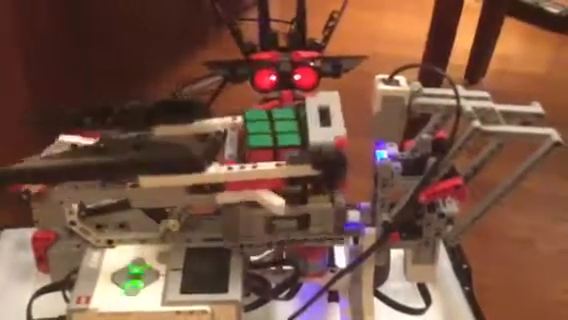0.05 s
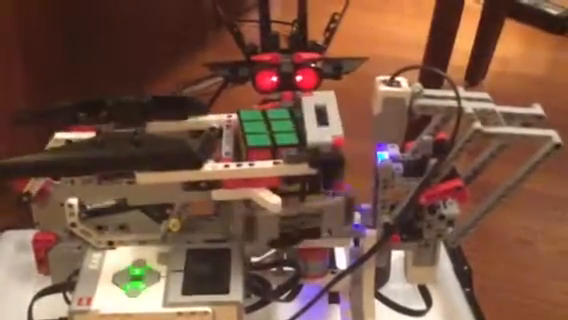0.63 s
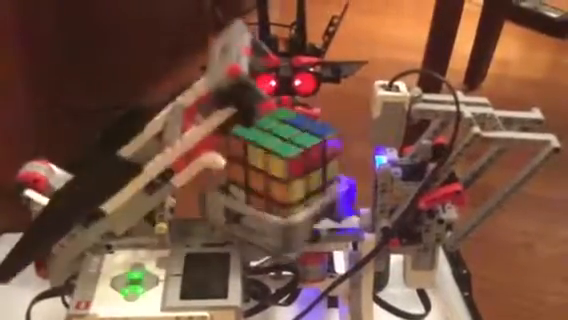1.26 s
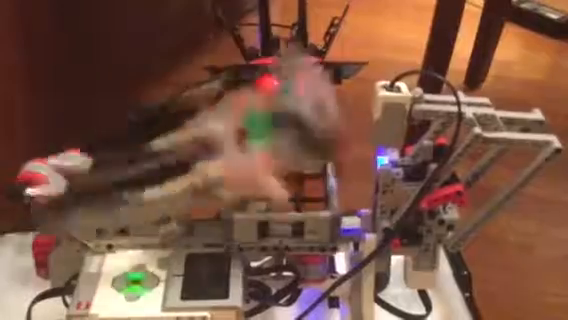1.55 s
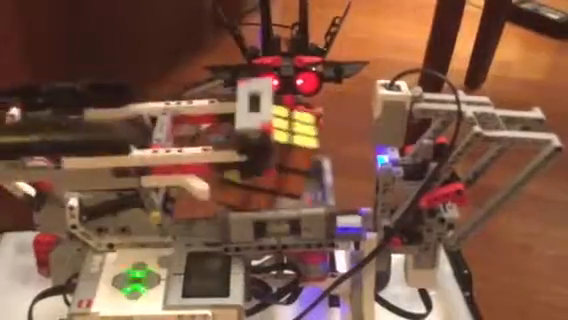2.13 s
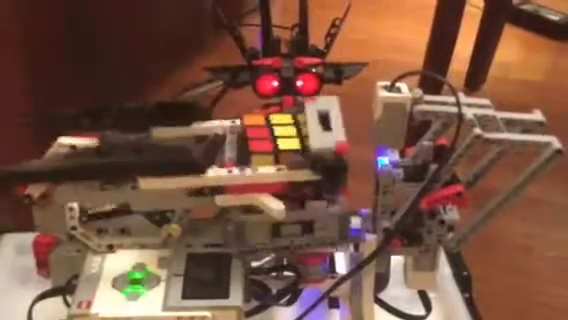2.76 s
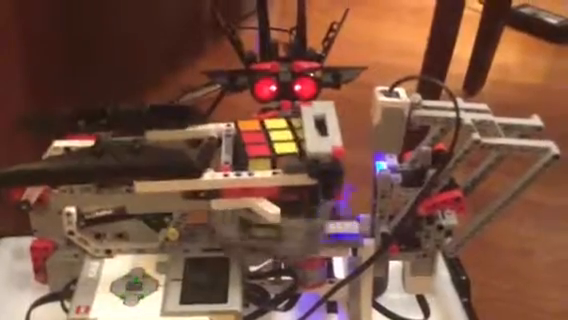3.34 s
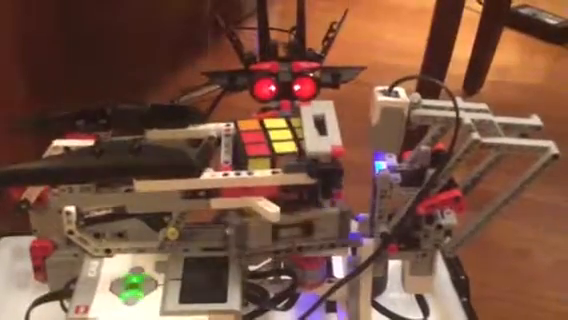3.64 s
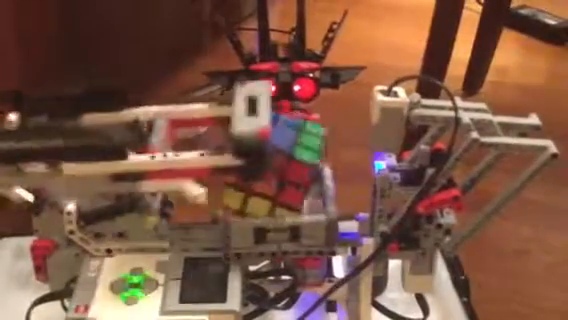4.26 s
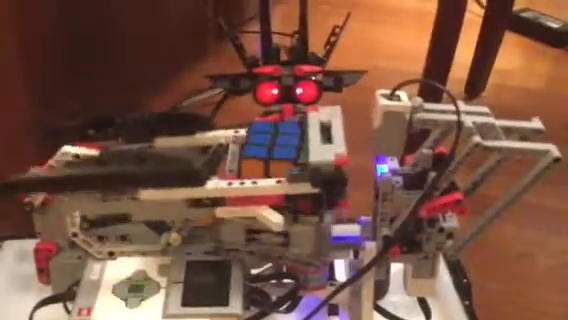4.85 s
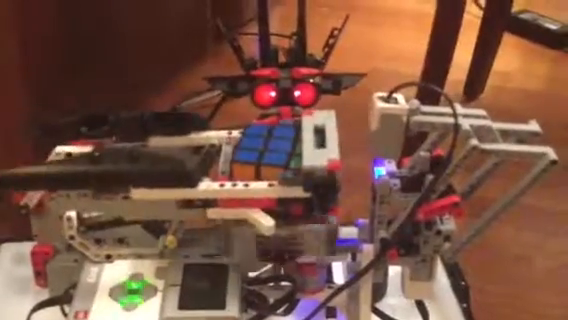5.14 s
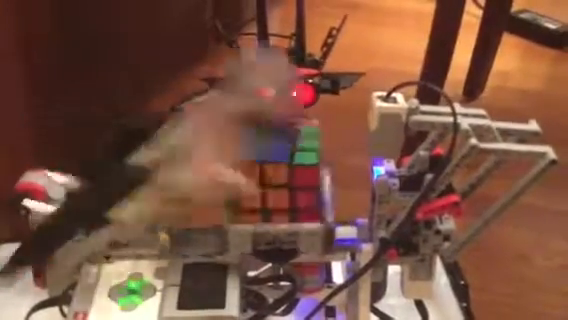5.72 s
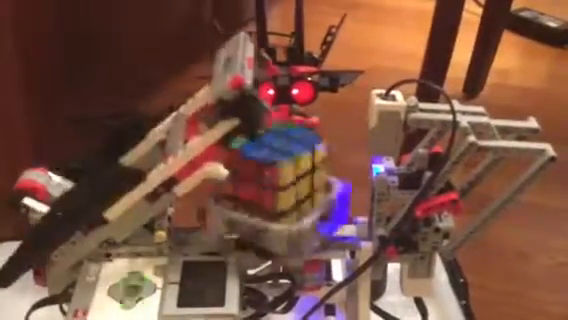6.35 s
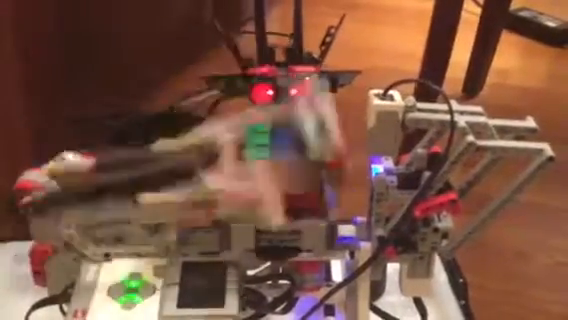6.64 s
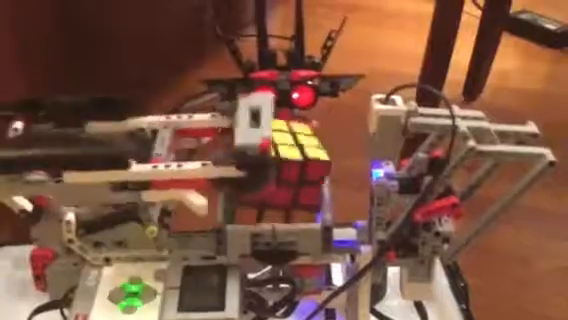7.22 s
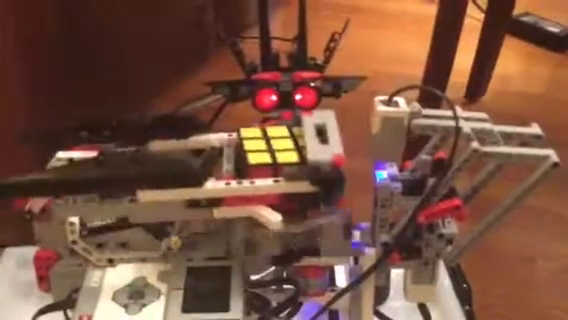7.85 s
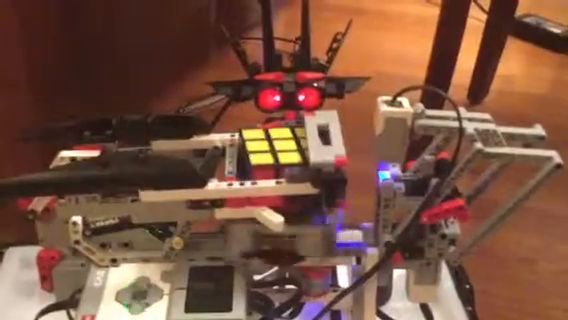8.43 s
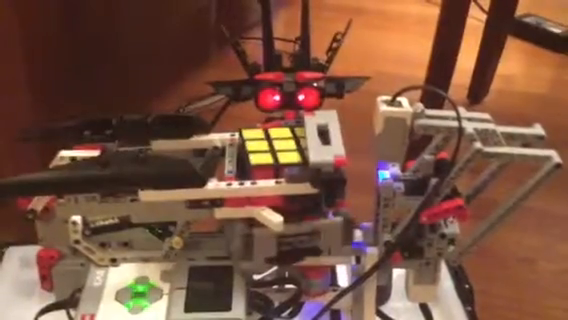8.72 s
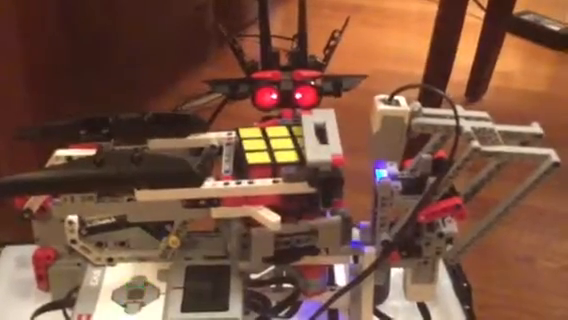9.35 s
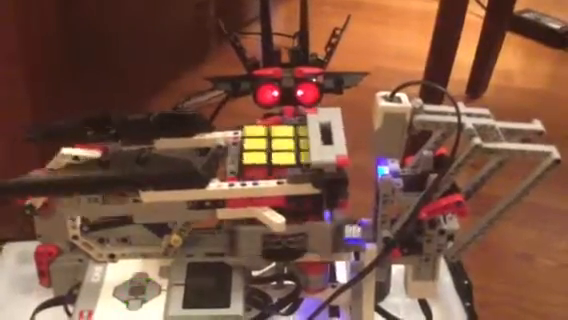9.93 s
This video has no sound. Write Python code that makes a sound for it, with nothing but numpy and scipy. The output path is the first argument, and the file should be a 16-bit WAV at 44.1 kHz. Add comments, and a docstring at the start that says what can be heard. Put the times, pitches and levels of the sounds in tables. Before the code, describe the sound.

Close up, a small geared motor gives a high, rattling whine as a toy robot twists a puzzle cube. Its plastic arm then swings in quick whirs that rise and fall, while cube and arm clack and rattle against the frame. This pattern comes three times, with two brief spells of loose gear chatter. A fourth whine ends the work, leaving the low hum of a quiet room.

```python
"""Toy robot turning a puzzle cube

A robot of plastic bricks works close to the microphone in a quiet room. One geared motor spins the
turntable, singing as it twists a layer of the held cube and chattering as it turns the cube freely.
A second swings the arm that holds and tips it. Cube and arm clack against the frame."""
import sys
import numpy as np
from scipy import signal
from scipy.fft import rfft, irfft
from scipy.io import wavfile

SR = 44100
rng = np.random.default_rng(int(sys.argv[2]) if len(sys.argv) > 2 else 0)


def unload_audio(sound):
    """Save the sound as a 16-bit wav file, at the path given as the first command line argument."""
    columns = np.transpose(np.atleast_2d(sound))
    # keep every value between -1 and 1, then stretch to whole-number steps
    steps = np.round(np.clip(columns, -1, 1) * 32767)
    wavfile.write(sys.argv[1], SR, steps.astype(np.int16))


N = 440118

# The turntable twists the held cube. Each row: start and brake in seconds, level in dB, boost of the
# low, middle and high gearbox resonance in dB, whine in dB, backlash from 0 to 1.
TWISTS = [(0.1, 0.546, -37.5, -2.5, 2.5, 4.3, -3, 0.61), (2.775, 3.569, -37.5, -1.5, 3.5, 4.5, -3.5, .35),
          (4.856, 5.293, -39.5, 4, -3, 8.3, -7, 0.44), (7.821, 8.608, -37.5, -2, 3.5, 4.8, -4, 0.27)]
# Running speed as the cube's friction loads the motor, one curve a twist.
# Each point: time in seconds, tooth rate in Hz.
TWIST_SPEED = [
    [(0.22, 1013), (0.278, 1015), (0.294, 1028), (0.37, 1045), (0.426, 1034), (0.545, 1067)],
    [(2.92, 978.1), (2.97, 995), (3.028, 1035), (3.168, 1050), (3.286, 1031), (3.424, 1037), (3.514, 1065),
     (3.56, 1057)],
    [(4.98, 971.4), (5.276, 1031), (5.29, 1058)],
    [(7.95, 987), (8.044, 1011), (8.214, 1033), (8.272, 1047), (8.462, 1062), (8.61, 1047)],
]
# The turntable runs free. Each row: start and brake in seconds, level in dB.
SPINS = [(1.135, 1.478, -40.5), (5.879, 6.537, -40)]
# The arm swings. Each row: start and length in seconds, top tooth rate in Hz, level in dB,
# then trims in dB for hollow frame, base shake and whine.
SWINGS = [(-.06, 0.11, 471, -54, 10, 6, -23), (0.734, 0.19, 469.7, -49.5, 5, 5.5, -23),
          (0.926, 0.23, 828, -45.5, -20, -9, -0.5), (1.557, .305, 601.3, -45, 7, 4, -19),
          (1.864, 0.28, 852, -44, 5.5, 0.5, -3.5), (2.026, .27, 602, -50, 10, 3, -25),
          (2.303, 0.27, 616.6, -43, -3, -1, -19), (2.527, 0.22, 469, -56, 0, 4, -25),
          (3.771, 0.17, 470.3, -48.5, 7, 5.5, -13), (3.943, 0.25, 866, -42.5, -3.5, -3.5, -5),
          (4.107, 0.32, 603, -49.5, 7.5, 8, -23), (4.382, 0.27, 619, -43, 0, -4, -28),
          (4.625, .18, 476, -56, -6, -8, -27), (5.514, 0.17, 470, -48, -1, 1, -25),
          (5.687, .24, 863.6, -45, -3, 2.5, 0.5), (6.609, 0.31, 600, -44.5, 5.5, 2, -12),
          (6.917, .275, 840, -43.5, -5.5, -5, -4.5), (7.073, 0.3, 590, -53.5, -1, -7, -23),
          (7.353, .28, 621.7, -43, 5.5, 1.5, -27), (7.575, 0.19, 465, -51, 0, 5, -23),
          (9.938, 0.17, 472, -51.5, 10, 1, -25)]
# Cube and arm hit the frame. Each row: start in seconds, level in dB, trims in dB for hollow
# midrange and thump, seconds for the chatter to fall 60 dB.
CLACKS = [(0.7767, -46, 1.5, -6, 0.041), (0.845, -42.5, 3, 7, 0.042), (1.2408, -29.5, -3, 1, 0.13),
          (1.632, -32, 4.5, -12, 0.058), (1.6769, -32, -5, -2, .089), (1.6946, -32, .5, 4, 0.057),
          (1.7595, -41, -10, 14.5, 0.04), (1.919, -43, 3, -1, 0.059), (1.9752, -24.5, -8, -17, 0.098),
          (2.1194, -25, -3, -5, 0.13), (2.152, -30.5, 0, -7, 0.049), (2.1742, -29, -3.5, -2, 0.045),
          (2.4003, -23, -6.5, -3.5, 0.064), (2.4683, -29.5, -4, 1.5, .12), (2.4964, -30, -5, -7, .056),
          (2.6254, -40, -2, -2, 0.06), (2.908, -31, 0, -5, .05), (4.0385, -24, -5.5, -7, 0.036),
          (4.1565, -29.5, -1.5, -15, 0.038), (4.1852, -23, -2, -5.5, 0.093), (4.3048, -47, -4, 7, 0.041),
          (4.3845, -37, -10, -2.5, 0.084), (4.4863, -26.5, -4.5, -4, 0.1), (4.5604, -25, -2, -6, .058),
          (4.6778, -42, -9, 6.5, 0.17), (6.0329, -28, -3, 5, 0.23), (6.6527, -42, -9, 6, 0.054),
          (6.7114, -27.5, 0, -6.5, 0.087), (6.746, -22.5, -5, -13, 0.022), (6.7788, -14.5, -8.5, -9, 0.043),
          (6.914, -37, -16, -4, .06), (6.9682, -39.5, -2.5, -2, 0.067), (7.0183, -29, -5, -4, 0.05),
          (7.1464, -30, -0.5, -3, 0.1), (7.2399, -28, 4, -1.5, 0.035), (7.4436, -30.5, 1.5, 3.5, 0.12),
          (7.5381, -25.5, -1, -8, 0.047), (7.6817, -37.5, -5, 4, 0.051)]
# Modes of the struck cube and cradle. Each row: pitch in Hz, level in dB, seconds to fall 60 dB.
CUBE_MODES = [(856, -3, 0.11), (1080, -9, .05), (1280, -2, 0.026), (1508, 1.5, 0.047), (2150, -13.5, .05),
              (2830, -19, 0.06)]
# Gear whine; the shaft, at a tenth of the tooth rate, adds sidebands.
# Each row: multiple of the tooth rate, level in dB.
TWIST_WHINE = [(1.001, -8.5), (1.6, -20), (2, -3), (2.6, -9), (3, 0.5), (3.3, -6), (3.5, -9), (3.6, -6),
               (3.7, -7), (3.999, 1.5), (4.2, -3), (5, -1.5), (5.6, -10), (5.7, -7), (6, -8), (7, 2.5),
               (7.3, -6), (7.7, 0.5), (8.3, 3)]
SPIN_WHINE = [(1, 4.5), (1.2, -1), (1.35, 7), (2, 2), (3.001, -1), (5, 1.5), (6, -12.5)]
ARM_WHINE = [(1.001, -13.5), (2, -2), (2.101, -9.5), (2.999, 2), (3.2, -3.5), (3.798, -8.5), (4.001, 3),
             (5.002, -3)]
# Tone colours of gears, clacks, hollow frame, base and room air. Each row: frequency in Hz, level in dB.
TWIST_COLOUR = [(150, -12.5), (550, -29), (900, -17), (1300, -27), (1800, -10.5), (2800, -13), (3900, -1),
                (4800, -6.5), (6700, -8), (7500, -1), (8600, -4.5), (9600, -8), (12500, -8.5), (14000, -20)]
SPIN_COLOUR = [(150, -23), (600, -25), (950, -12), (1350, -21.5), (2200, -12), (3000, -16), (3700, -7),
               (6600, -8), (8400, -1.5), (9800, -9), (12000, -13), (15500, -20.5)]
ARM_COLOUR = [(250, -32.5), (450, -23), (850, -7.5), (1300, -10), (1800, -3), (2500, -9), (3500, 1.5),
              (5900, 1), (7600, 3), (9000, -0.5), (11500, -6), (15500, -15.5)]
CLACK_COLOUR = [(250, -34), (540, -18.5), (900, -12), (1800, -6), (3200, -5.5), (6800, 3), (8500, -2),
                (11000, -7.5), (15500, -10)]
HOLLOW_COLOUR = [(300, -17), (550, -14), (850, 0.5), (1100, -2), (1400, -3), (2000, -11.5), (3000, -1),
                 (5000, -14)]
BASE_COLOUR = [(25, -38.5), (45, -17), (75, -0.5), (130, -10.5), (250, 2.5), (310, -6), (420, -9),
               (700, -33.5)]
AIR_COLOUR = [(18, -47.5), (30, -22.5), (59, -8.5), (90, -24.5), (123, -4), (177, -10.5), (225, -12),
              (359, -14.5), (455, -28), (591, -28.5), (639, -30.5), (1140, -37), (1470, -34.5), (1590, -37),
              (15500, -53)]
FLAT = [(1, 0), (20000, 0)]
# Peaks and dips of the plastic housing. Each row: centre and width in Hz, gain in dB.
HOUSING = [(4980, 260, -0.5), (6730, 380, 0.5), (7414, 190, 7.5), (7837, 137, 7.5), (8335, 284, 6.5),
           (8840, 260, 6), (10630, 300, -3), (10470, 160, 6), (11620, 540, -12), (12000, 450, 3),
           (13200, 299, -22)]
# Resonances of the turntable's gearbox. Each row: centre and width in Hz.
GEARBOX = [(1900, 900), (3560, 500), (5950, 940)]
# Low tones while the turntable runs. Each row: start and end in seconds, pitch in Hz, level in dB.
DRONES = [(3.21, 3.618, 393.7, -67), (6.1, 6.6, 360.5, -68)]
# Reflections off table and frame. Each row: delay in seconds, gain as a factor.
REFLECTIONS = [(.0029, 0.2), (.0047, -0.22), (.0071, 0.049), (0.0105, .2), (0.0138, -0.094)]
# The room's decay. Each row: frequency in Hz, seconds to fall 60 dB.
ROOM_DECAY = [(150, 0.63), (1000, 0.44), (4000, 0.33), (8000, 0.24), (15000, 0.1)]

RING_HZ, RING_WIDTH_HZ, RING_DB = 4068, 33, 7.5  # narrow turntable ring that the whine sweeps through
RUN_UP_S, START_SHARE, RUN_UP_POWER = .144, .46, 1.14
COAST_S, COAST_DB_PER_S = .35, 295.5
SPIN_TOOTH_HZ, SPIN_WOBBLE_DB = 802.5, 1.18
SWING_SPEED_POWER, SWING_LEVEL_POWER, SWING_WHINE_POWER = .7, 1.38, 6.4
SLACK_RISE_DB = 11
TICKS_PER_S, TICK_DB, TICK_S = 32, -1.5, .006
CLACK_RISE_S, THUMP_TOP_HZ = .00092, 246.6
AIR_DB, HUM_HZ, HUM_DB = -62.5, 121.7, -69


def turntable_twists():
    """Under load the turntable gears mesh tightly and sing; starting and braking, they rattle loose."""
    out = np.zeros(N)
    for (start, brake, db, *gearbox_db, whine_db, backlash), curve in zip(TWISTS, TWIST_SPEED):
        t, speed, loudness = turntable_motor(start, brake)
        tooth_hz = speed * np.interp(t, *np.transpose(curve)) * (1 + .002 * waver(len(t), 60))
        meshed = np.clip((brake - t) / .025 + 1, 0, 1) * np.minimum(speed, 1) ** 6
        teeth = gear_rattle(tooth_hz, loose=1 - (1 - backlash) * meshed, scrape=.5, uneven_db=1.8)
        rattle = unit_rms(coloured(teeth, TWIST_COLOUR, HOUSING))
        whine = gear_whine(tooth_hz, TWIST_WHINE, flutter_db=2.5) * meshed
        slack = unit_rms(coloured(teeth, HOLLOW_COLOUR)) * (1 - meshed)
        gears = gain_of(-1.5) * rattle + gain_of(whine_db) * whine + gain_of(-13) * slack
        resonances = [(*mode, boost) for mode, boost in zip(GEARBOX, gearbox_db)]
        resonances.append((RING_HZ, RING_WIDTH_HZ, RING_DB))
        add(out, start, gain_of(db) * loudness * unit_rms(coloured(gears, FLAT, resonances)))
    return out


def turntable_spins():
    """Running free, the turntable is slower, wobbles, and its slack gears chatter brightly."""
    out = np.zeros(N)
    for start, brake, db in SPINS:
        t, speed, loudness = turntable_motor(start, brake)
        tooth_hz = SPIN_TOOTH_HZ * speed * (1 + .005 * waver(len(t), 40))
        teeth = gear_rattle(tooth_hz, loose=.45, scrape=.4, uneven_db=2.8)
        rattle = unit_rms(coloured(teeth, SPIN_COLOUR, HOUSING))
        whine = gear_whine(tooth_hz, SPIN_WHINE, flutter_db=3) * speed ** 6
        gears = gain_of(1.1) * rattle + gain_of(-20.5) * whine
        add(out, start, gain_of(db + SPIN_WOBBLE_DB * waver(len(t), 19)) * loudness * gears)
    return out


def turntable_motor(start, brake):
    """The motor runs up from a share of full speed, growing louder, and coasts down after the brake."""
    t = np.arange(start, brake + .2, 1 / SR)
    run_up = np.clip((t - start) / RUN_UP_S, 0, 1)
    coasted_s = np.maximum(t - brake, 0)
    speed = (START_SHARE + (1 - START_SHARE) * run_up) * np.maximum(1 - coasted_s / COAST_S, .1)
    loudness = run_up ** RUN_UP_POWER * gain_of(-COAST_DB_PER_S * coasted_s)
    return t, speed, loudness


def arm_swings():
    """The motor speeds up and slows in an arch, singing at the top; the linkage shakes frame and base."""
    out = np.zeros(N)
    for start, length, top_hz, db, hollow_db, base_db, whine_db in SWINGS:
        t = np.arange(max(start, 0), start + length, 1 / SR)
        progress = (t - start) / length
        arch = np.maximum(np.sin(np.pi * progress), 1e-3)
        tooth_hz = top_hz * arch ** SWING_SPEED_POWER * (1 + .007 * waver(len(t), 120))
        teeth = gear_rattle(tooth_hz, loose=.6, scrape=.4, uneven_db=3) * brick_ticks(len(t))
        rattle = gain_of(1) * unit_rms(coloured(teeth, ARM_COLOUR, HOUSING))
        frame = gain_of(hollow_db - 11.5) * unit_rms(coloured(teeth, HOLLOW_COLOUR))
        base = gain_of(base_db - 9.5) * unit_rms(coloured(teeth, BASE_COLOUR))
        singing = gain_of(whine_db) * arch ** SWING_WHINE_POWER
        whine = singing * gear_whine(tooth_hz, ARM_WHINE, flutter_db=3)
        slack = gain_of(SLACK_RISE_DB * (progress - 1))  # the linkage rattles more late in the swing
        swing = rattle + slack * (frame + base) + whine
        add(out, t[0], gain_of(db) * arch ** SWING_LEVEL_POWER * swing)
    return out


def gear_rattle(tooth_hz, loose, scrape, uneven_db, tooth_count=10):
    """Pinion teeth click in turn, each in its own way, so the pattern repeats with the shaft."""
    teeth_passed = np.cumsum(tooth_hz) / SR
    flanks = rng.standard_normal((tooth_count, 64))
    wear = flanks.ravel()[(teeth_passed * flanks.shape[1]).astype(int) % flanks.size]
    contact = scrape + np.exp(-(teeth_passed % 1) / 1.2)
    tooth_db = uneven_db * np.clip(rng.standard_normal(N // 10), -2.5, 2.5)
    force = gain_of(tooth_db)[teeth_passed.astype(int)]
    loose = np.clip(loose, 0, 1)  # backlash makes a share of the contact random
    grit = np.sqrt(1 - loose) * wear + np.sqrt(loose) * rng.standard_normal(len(tooth_hz))
    return contact * force * grit


def gear_whine(tooth_hz, partials, flutter_db):
    """Meshing teeth sing in partials locked to the tooth rate, each swelling and fading a little."""
    phase = 2 * np.pi * np.cumsum(tooth_hz) / SR
    whine = np.zeros(len(phase))
    for multiple, db in partials:
        swell = gain_of(db + flutter_db * waver(len(phase), 28))
        whine += swell * np.sin(multiple * phase + 2 * np.pi * rng.random())
    return unit_rms(whine)


def brick_ticks(n):
    """Brief random jumps in contact force as loose bricks knock together."""
    knocks = (rng.random(n) < TICKS_PER_S / SR) * rng.random(n)
    return 1 + gain_of(TICK_DB) * signal.lfilter([1], [1, -np.exp(-1 / (TICK_S * SR))], knocks)


def clacks():
    """A crack and the chatter of loose bricks, the hollow ring of the cube, a thump through the base."""
    out, t = np.zeros(N), np.arange(SR // 4) / SR
    for start, db, hollow_db, thump_db, t60 in CLACKS:
        grain, knock, push = rng.standard_normal((3, len(t)))
        fade = gain_of(-60 * t / t60)
        snap = np.exp(-t / .0022)
        crack = unit_rms(coloured(grain, CLACK_COLOUR, HOUSING)) * (.45 * fade + .48 * snap)
        body = unit_rms(coloured(knock, HOLLOW_COLOUR)) * fade
        hollow = gain_of(hollow_db - 11) * (body + .42 * cube_ring(t))
        base_tone = np.sin(2 * np.pi * THUMP_TOP_HZ * rng.uniform(.76, 1) * t)
        base = unit_rms(coloured(push, BASE_COLOUR)) + 1.37 * base_tone
        thump = gain_of(thump_db - 19) * base * np.exp(-t / .03) * (1 - np.exp(-t / .006))
        attack = 1 - np.exp(-t / CLACK_RISE_S)
        add(out, start, gain_of(db - 2.5) * (crack + hollow + thump) * attack)
    return out


def cube_ring(t):
    """Cube and cradle ring briefly; each blow lands elsewhere, so the modes shift a little."""
    ring = np.zeros(len(t))
    for hz, db, t60 in CUBE_MODES:
        cycles = hz * rng.uniform(1, 1.05) * t + rng.random()
        ring += gain_of(db - 60 * t / t60) * np.sin(2 * np.pi * cycles)
    return ring


def drones():
    """Soft low tones swell and fade under the turntable."""
    out = np.zeros(N)
    for start, end, hz, db in DRONES:
        t = np.arange(start, end, 1 / SR)
        tone = np.sin(2 * np.pi * hz * t + .4 * waver(len(t), 27))
        add(out, start, gain_of(db) * unit_rms(tone * signal.windows.tukey(len(t), .5)))
    return out


def close_reflections(x):
    """Bounces off table and frame cut fine peaks and notches into the sound."""
    out = x.copy()
    for delay, gain in REFLECTIONS:
        add(out, delay, gain * x)
    return out / np.sqrt(1 + sum(gain ** 2 for _, gain in REFLECTIONS))


def room_reverb(x):
    """A tail of sparse reflections, the treble dying first."""
    t = np.arange(SR // 2) / SR
    echoes = rng.choice([-1., 1.], len(t)) * (rng.random(len(t)) < 3000 / SR) * (t > .004)
    hz, age, bands = signal.stft(echoes, SR, nperseg=256)
    decay = gain_of(-60 * age / curve_at(ROOM_DECAY, hz)[:, None])
    tail = signal.istft(bands * decay, SR, nperseg=256)[1]
    return signal.fftconvolve(x, tail / np.linalg.norm(tail))[:N]


def room_tone():
    """A bed of low ventilation rumble, faint hiss and mains hum."""
    t = np.arange(N) / SR
    air = unit_rms(coloured(rng.standard_normal(N), AIR_COLOUR, size=8192))
    hum = np.sqrt(2) * np.sin(2 * np.pi * HUM_HZ * t) * gain_of(1.5 * waver(N, 6))
    return gain_of(AIR_DB) * air + gain_of(HUM_DB) * hum


def gain_of(db):
    """Decibels to amplitude."""
    return 10 ** (np.asarray(db) / 20)


def unit_rms(x):
    """Scales to rms 1."""
    return x / np.sqrt(np.mean(x ** 2) + 1e-20)


def curve_at(points, hz):
    """Reads a curve on a log-frequency axis."""
    point_hz, value = np.transpose(points)
    return np.interp(np.log(hz + 1), np.log(point_hz + 1), value)


def add(mix, start, sound):
    """Mixes a sound in at a start time in seconds."""
    part = mix[max(round(start * SR), 0):][:len(sound)]
    part += sound[:len(part)]


def waver(n, hz):
    """Random drift of rms near 1, moving at rates up to about hz."""
    spectrum = rfft(rng.standard_normal(n + SR))
    roll_off = 1 + (np.fft.rfftfreq(n + SR, 1 / SR) / hz) ** 4
    return unit_rms(irfft(spectrum / roll_off))[:n]


def coloured(x, colour, peaks=(), size=2048):
    """Minimum-phase EQ: a broad tone colour plus narrow peaks and dips."""
    hz = abs(np.fft.fftfreq(size, 1 / SR))
    peaks_db = sum(db / (1 + (2 * (hz - centre) / width) ** 2) for centre, width, db in peaks)
    log_gain = np.log(gain_of(curve_at(colour, hz) + peaks_db))
    taps = np.fft.ifft(np.exp(np.conj(signal.hilbert(log_gain)))).real
    return signal.fftconvolve(x, taps[:size // 2])[:len(x)]


def scene():
    """Motors and clacks up front, a little reverb and the quiet room behind, in mono."""
    motors = close_reflections(turntable_twists() + turntable_spins() + arm_swings()) + drones()
    hits = close_reflections(clacks())
    reverb = room_reverb(gain_of(-12) * motors + gain_of(-10) * hits)
    return (gain_of(-1.06) * motors + gain_of(2.92) * hits + reverb + room_tone())[None]


def record(dry):
    """The microphone rolls off the bass below 36 Hz; the recorder cuts the top at 15.5 kHz."""
    low_cut = signal.butter(4, 36, "highpass", fs=SR, output="sos")
    high_cut = signal.firwin(511, 15500, window=("kaiser", 9), fs=SR)
    return signal.oaconvolve(signal.sosfilt(low_cut, dry), high_cut[None], "same")


dry = scene()
out = record(dry)
unload_audio(out)
```